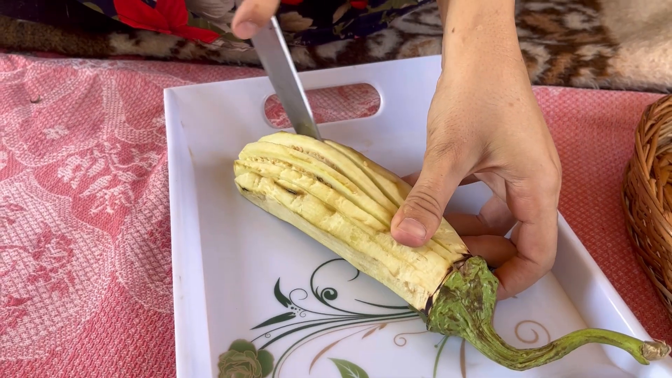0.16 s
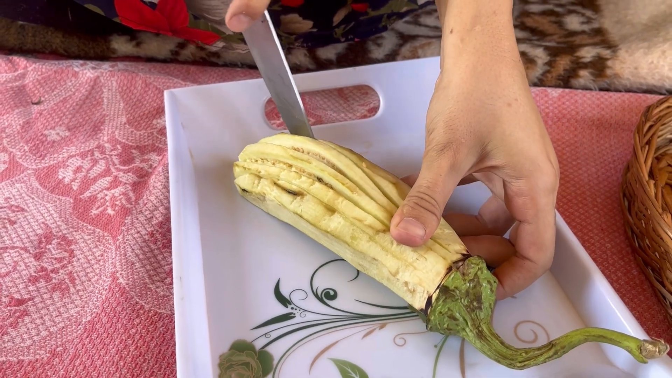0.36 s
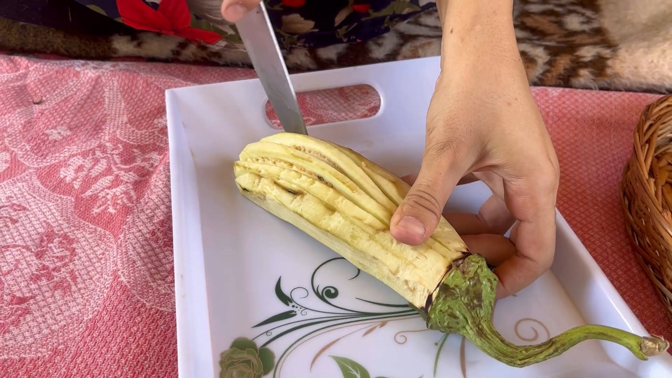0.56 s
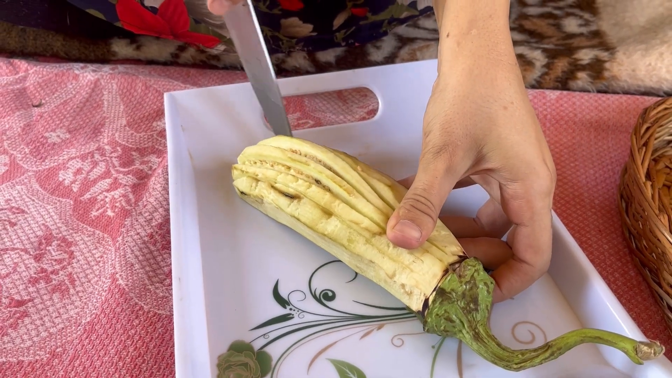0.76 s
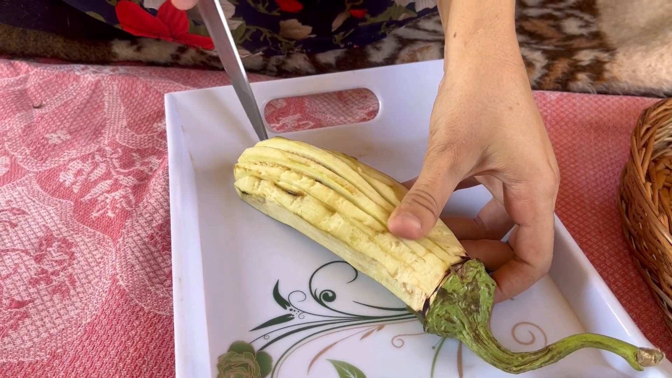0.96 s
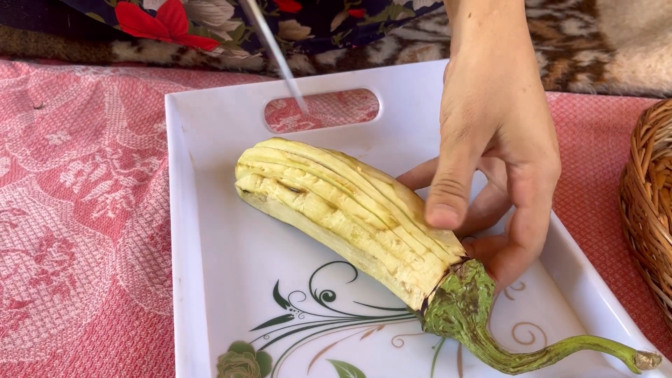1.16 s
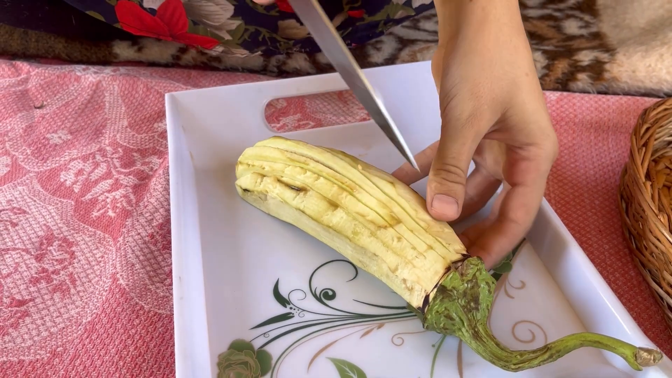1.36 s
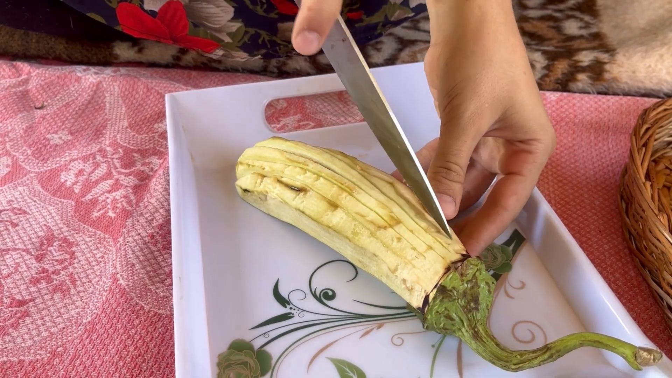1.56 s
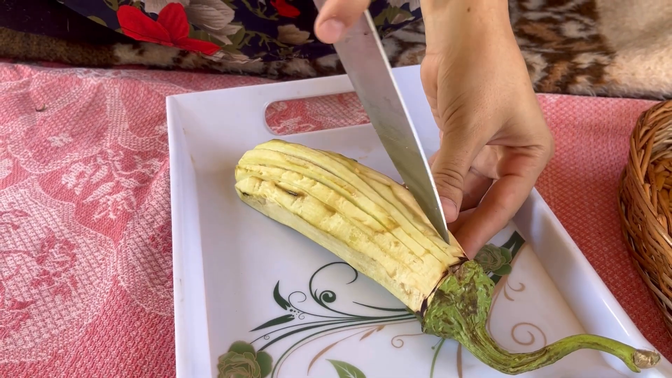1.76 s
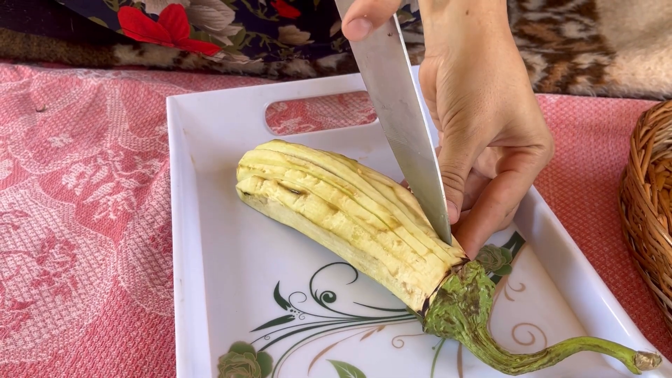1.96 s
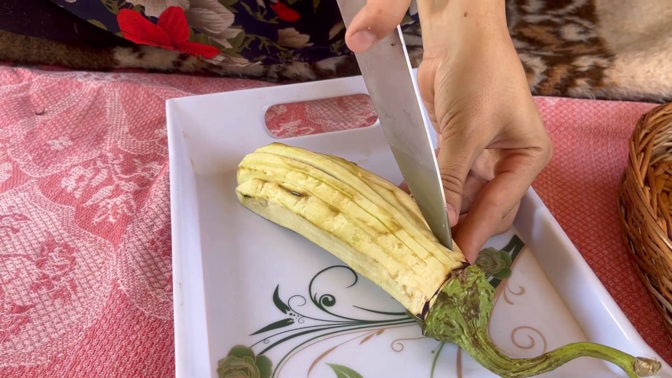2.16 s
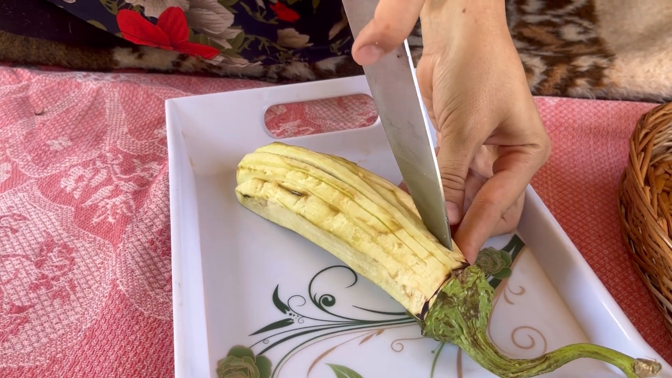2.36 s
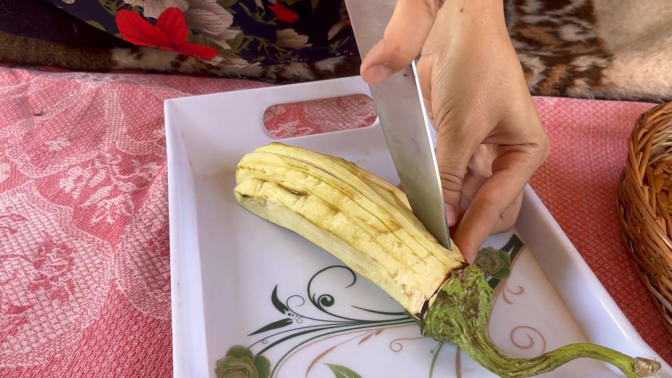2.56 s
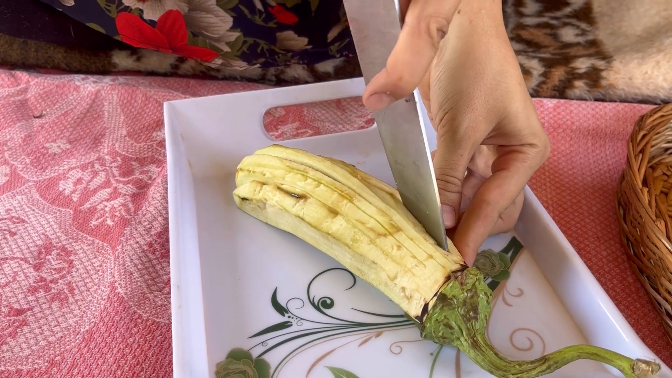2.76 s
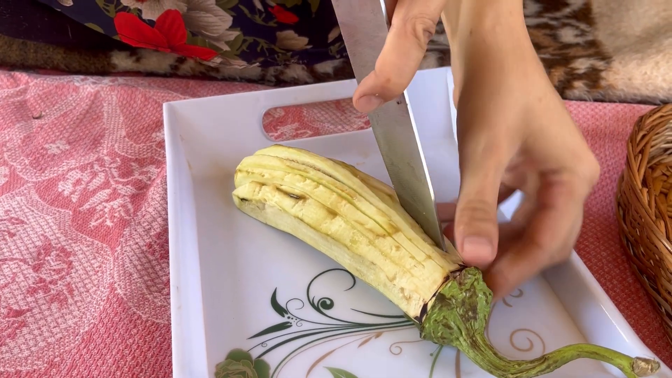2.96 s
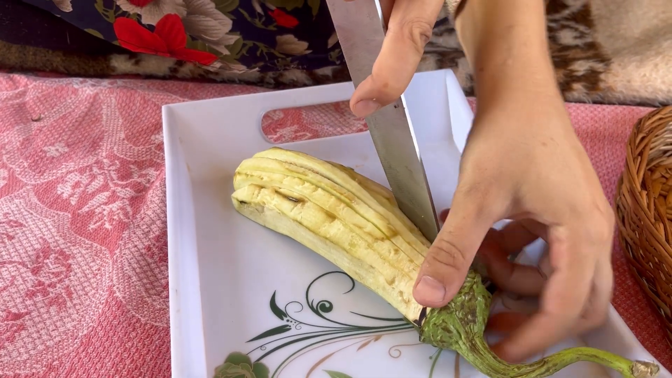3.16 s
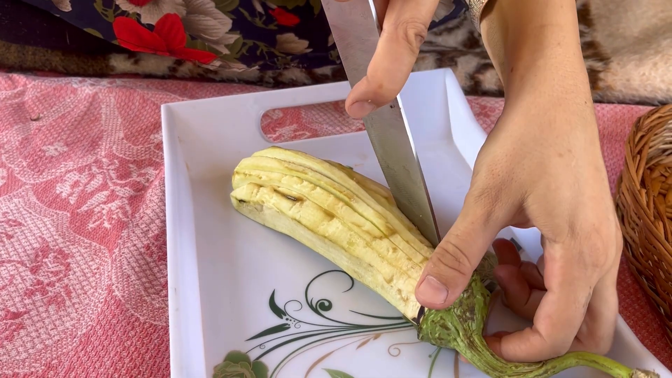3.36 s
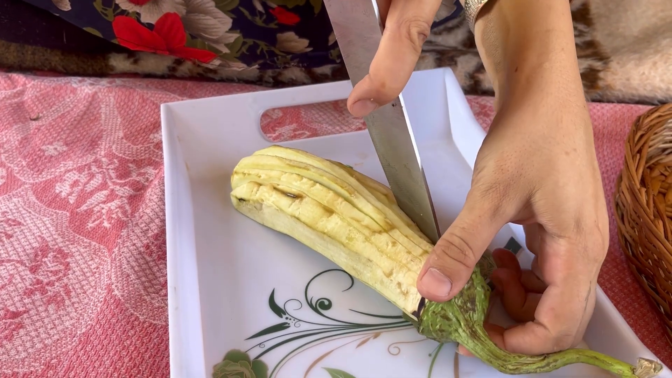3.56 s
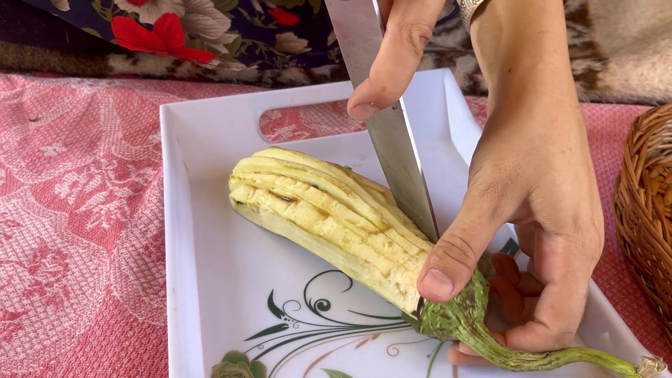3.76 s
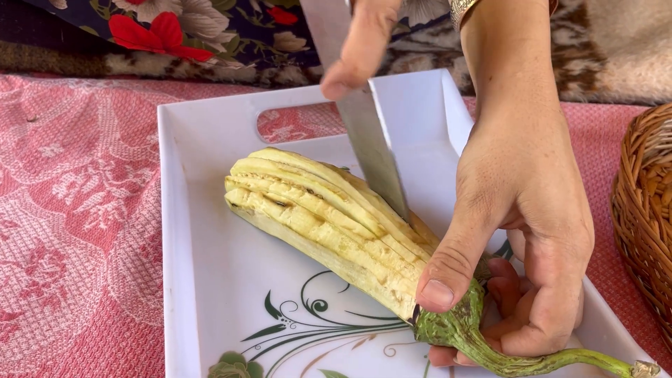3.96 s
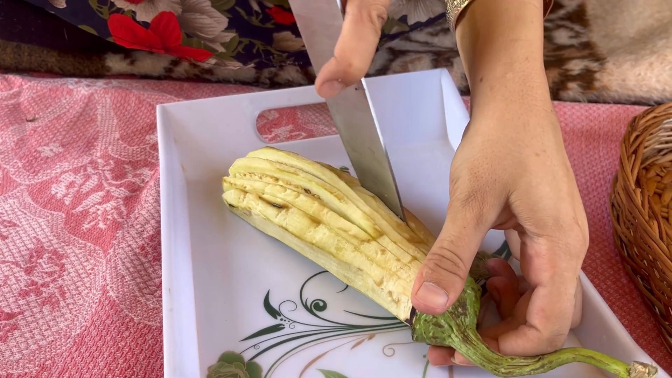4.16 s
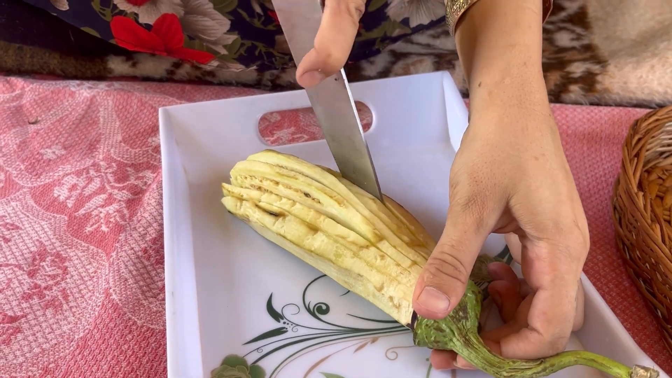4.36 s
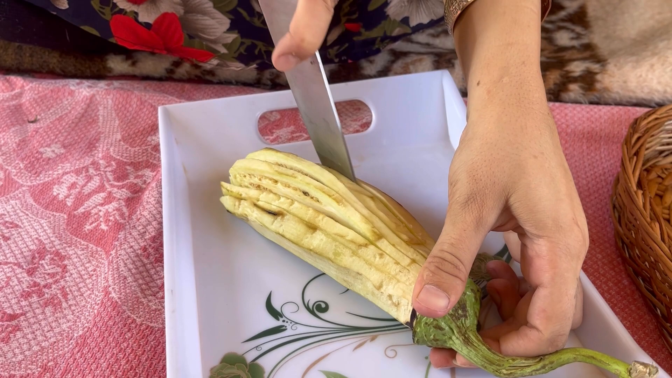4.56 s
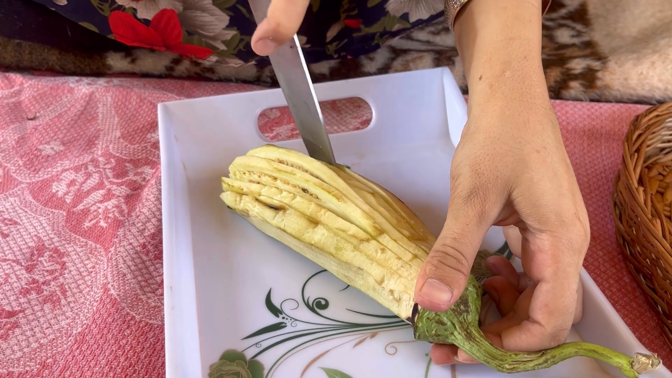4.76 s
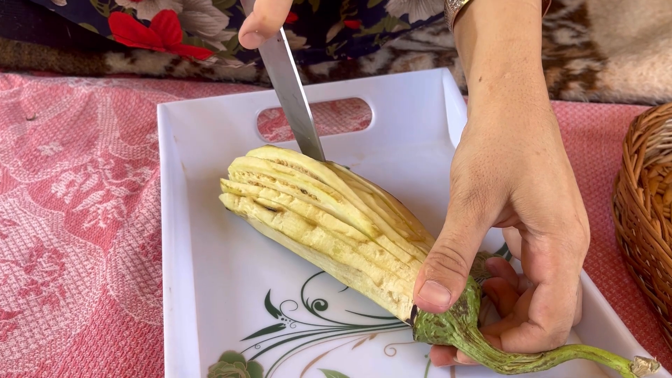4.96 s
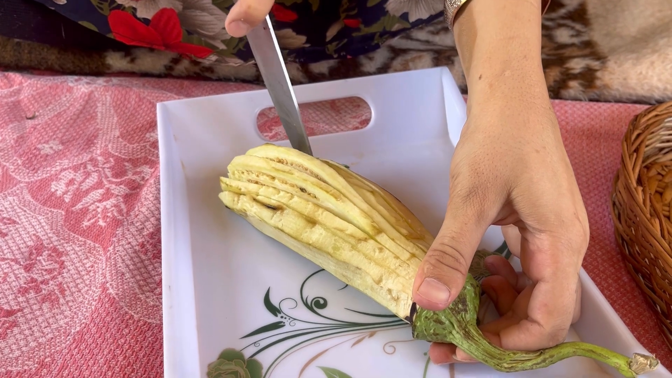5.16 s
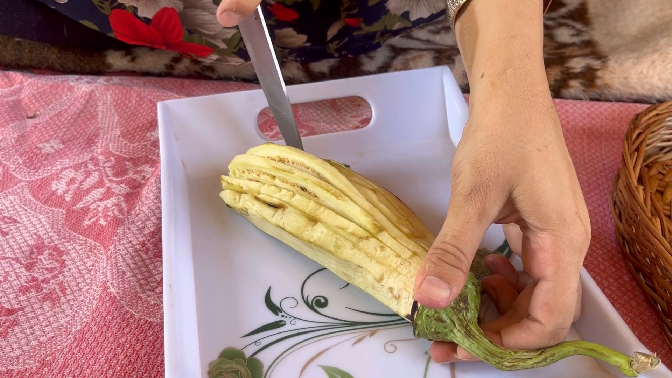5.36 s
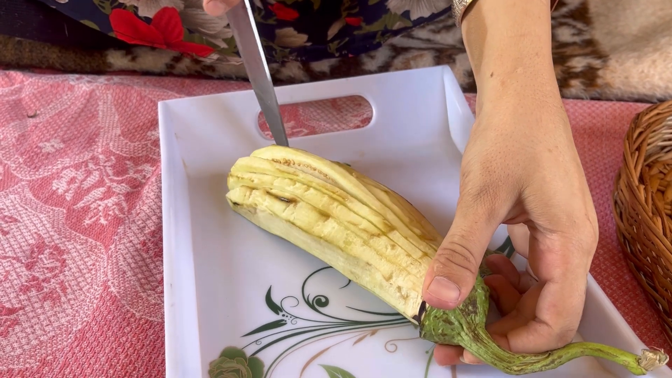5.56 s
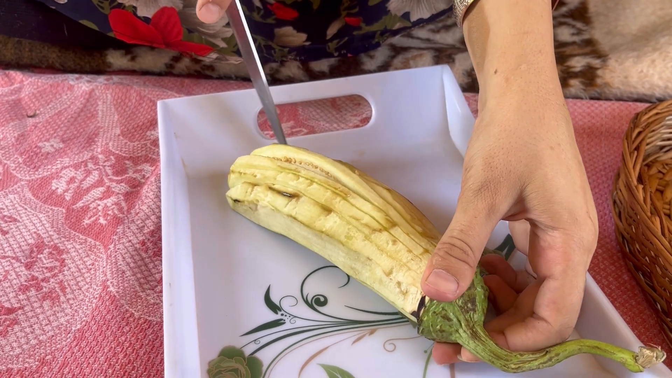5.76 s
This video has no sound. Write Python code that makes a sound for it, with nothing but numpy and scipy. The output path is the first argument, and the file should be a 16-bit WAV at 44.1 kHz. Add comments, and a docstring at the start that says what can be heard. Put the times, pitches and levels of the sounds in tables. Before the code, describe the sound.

Close stereo pickup in a quiet room: a knife cuts a peeled eggplant on a plastic tray. Sharp knocks and short gritty strokes with a brief steely ring fill the first second. A quieter stretch follows, with barely audible slides and one strong tap, before sawing and tapping resume near four seconds. Soft air noise, fuzzy hum and uneven low rumble stay underneath.

```python
"""A kitchen knife cuts a peeled vegetable on a plastic tray, close to two microphone ports, in a quiet room.
First second: the tip knocks the tray (click, falling sweep, modes); short strokes rasp and ring the blade.
Until 3.9 s: mostly faint slides (quieter strokes) and a few knocks; then strokes and knocks again.
Strokes are gritty noise through power arches, blade resonances and tray spectra.
Throughout: coloured air noise, two fuzzy hums and a low rumble of changing level (resonated noise)."""
import sys
import numpy as np
from scipy import signal
from scipy.fft import rfft, irfft
from scipy.io import wavfile
from scipy.ndimage import uniform_filter1d

SR = 44100
rng = np.random.default_rng(int(sys.argv[2]) if len(sys.argv) > 2 else 0)


def generate_wav(sig):
    """Save sig (samples, or channels by samples) to the path in sys.argv[1] as 16-bit PCM at SR."""
    pcm = np.round(np.clip(np.atleast_2d(sig).T, -1, 1) * 32767).astype(np.int16)
    wavfile.write(sys.argv[1], SR, pcm)


N = 255545


def gain_of(db):
    """Decibels to gain."""
    return 10 ** (np.asarray(db) / 20)


def evened(x):
    """Scales to rms 1."""
    return x / np.sqrt(np.mean(x ** 2) + 1e-20)


def read(points, hz, column=1):
    """Reads a table on a log-frequency axis."""
    table = np.transpose(points)
    return np.interp(np.log(hz + 1), np.log(table[0] + 1), table[column])


def coloured(x, points):
    """Filters x by a table of gains, at rms 1."""
    hz = np.fft.rfftfreq(x.shape[-1], 1 / SR)
    return evened(irfft(rfft(x) * gain_of(read(points, hz)), x.shape[-1]))


def resonate(x, hz, width_hz):
    """A fixed one-pole resonance of gain 1 at its peak."""
    pole = np.exp((2j * np.pi * hz - np.pi * width_hz) / SR)
    return 2 * signal.lfilter([1 - abs(pole)], [1, -pole], x + 0j).real


def patchy(x, depth_db, bins, frames):
    """Random drifting peaks and dips over time and frequency, alike for both rows."""
    z = signal.stft(x, nperseg=512, noverlap=384)[2]
    field = rng.standard_normal(z.shape[1:])
    field = uniform_filter1d(field, size=bins, axis=0)
    field = uniform_filter1d(field, size=frames, axis=1)
    field = gain_of(depth_db * evened(field))
    return signal.istft(z * evened(field), nperseg=512, noverlap=384)[1][:, :N]


# phase between the ports: (frequency [Hz], lead of left [rad])
PORT_LEAD = [(60, 0), (600, .3), (1290, .5), (1900, 2.4), (2300, .3), (3900, .8), (5340, .9), (6100, .4),
             (6600, -1.2), (8100, -1.4), (9000, -2.2), (9500, -np.pi), (11000, -np.pi), (13700, -2 * np.pi)]
# level between the ports: (frequency [Hz], left minus right [dB])
PORT_TILT = [(60, .1), (380, .1), (700, -1.1), (1290, -1.1), (2380, 1.5), (4400, 4.), (8120, 1.1),
             (9500, 0)]
# decorrelation of the ports: (frequency [Hz], unlike share near the knife [0-1], in the room [0-1])
PORT_UNLIKE = [(60, .1, .2), (400, .08, .5), (1300, .4, .8), (2500, .3, .8), (6000, .35, .7),
               (9000, .2, .4), (12300, .2, .3), (13800, .02, .02)]


def ports(x, other, unlike_column):
    """Two microphone ports: part of the sound is unrelated, the rest is shifted in phase and level."""
    hz = np.fft.rfftfreq(N, 1 / SR)
    unlike = np.clip(read(PORT_UNLIKE, hz, column=unlike_column), 0, 1)
    same = np.sqrt(1 - unlike ** 2 / 2) * rfft(x)
    odd = unlike / np.sqrt(2) * rfft(other)
    skew = gain_of(read(PORT_TILT, hz) / 2) * np.exp(.5j * read(PORT_LEAD, hz))  # half to each port
    return irfft([(same + odd) * skew, (same - odd) / skew], N)


# relative spectrum of the air noise: (frequency [Hz], density [dB per Hz])
AIR_SPECTRUM = [(30, -42), (60, -5), (250, -10.5), (450, -15), (900, -8.5), (1300, -5.5), (1900, -4),
                (2600, -9), (2900, -13.5), (4500, -15), (6200, -17.5), (6800, -22), (10000, -27),
                (13500, -26.5), (16000, -44)]
# levels of rumble and hums: (time [s], low rumble [dB], hum near 520 Hz [dB], whirr near 1380 Hz [dB])
HUM_LEVELS = [(0, -58, -66.5, -67), (.4, -67.5, -64.5, -61.5), (.84, -72, -64, -60), (1.0, -68, -64, -61.5),
              (1.38, -75, -64, -60.5), (1.48, -89, -77.5, -65.5), (2.05, -88, -75.5, -66),
              (2.6, -74, -78, -66), (2.78, -59, -69, -56.5), (2.9, -79, -65, -62.5), (3.241, -78, -69, -60),
              (3.45, -85, -79.5, -68.5), (3.92, -73, -73.5, -67), (4.11, -75, -62, -67),
              (4.42, -69, -65, -59), (4.8, -81, -68.5, -60.5), (5.3, -74, -62.5, -62.5),
              (5.55, -57.5, -65, -60), (5.79, -67, -65.5, -61.5)]


def room():
    """Soft air noise, two fuzzy hums and a low rumble of changing level, as resonated noise."""
    time_s, *columns = np.transpose(HUM_LEVELS)
    low_db, hum_db, whirr_db = (np.interp(np.arange(N) / SR, time_s, db) for db in columns)
    air_db = -62.5 + 0.15 * (hum_db + 76.5)  # follows the hum by 0.15 dB per dB
    noise = rng.standard_normal((4, 2, N))
    uneven = patchy(noise[0], 1.5, bins=2, frames=200)  # the colour of the air drifts a little at random
    air = coloured(uneven, AIR_SPECTRUM)
    low = resonate(resonate(noise[1], 73.5, 38), 73.5, 38) + gain_of(-10.5) * resonate(noise[1], 140, 40)
    hum = resonate(resonate(noise[2], 521.6, 55), 521.6, 55)
    whirr = resonate(resonate(noise[3], 1375, 190), 1375, 190)
    sound = gain_of(air_db) * air + gain_of(low_db) * evened(low)
    sound += gain_of(hum_db) * evened(hum) + gain_of(whirr_db) * evened(whirr)
    return ports(*sound, unlike_column=2)


# relative spectrum of the click: (frequency [Hz], gain [dB])
CLICK_SPECTRUM = [(300, -44), (1000, 19), (2200, 11), (3000, 3), (4000, 6.5), (5000, 5.5), (8000, -2),
                  (12500, 0), (16000, -19)]
# modes of the tray held down by the vegetable, before pitch factor and ring or click level:
# (frequency [Hz], level [dB], t60 [s])
TRAY_MODES = [(117, -5, 0.1), (217, -16, 0.086), (269, -4.5, 0.072), (337, 7.5, 0.037),
              (458.5, -13.5, 0.11), (805, -17.5, 0.047), (1130, -10, 0.012), (1584, -10, 0.029),
              (1830, -15, 0.002), (2310, -13, 0.03), (2390, -8, 0.02), (3240, -20, 0.031),
              (3970, -21, 0.022)]


def knock(sweep_hz, under_hz, t60_s, click_db, ring_db, pitch):
    """Bending waves disperse: a click, a falling sweep, then the modes of the tray."""
    t = np.arange(SR // 5) / SR
    cycles = 2 * sweep_hz * np.sqrt(t / 1000) + under_hz * t  # pitch falls as 1 / sqrt(t)
    crest = np.argmax(cycles >= 1)
    since_crest_s = t - t[crest]
    onset = np.minimum(t / t[crest], 1) ** 2
    sweep = np.cos(2 * np.pi * cycles) * onset * gain_of(-60 * (t / t60_s) ** 0.94)
    burst = rng.standard_normal((2, len(t))) * gain_of(-1.5 - 60 * t / 0.015)  # grit under the tip
    burst[0, crest] += 2.5
    click = coloured(burst, CLICK_SPECTRUM) * (t < .1)
    ring = 0
    for hz, db, decay_s in TRAY_MODES:
        part_db = ring_db if hz < 700 else click_db  # upper modes follow the hardness of the click
        swell = 1 - np.exp(-t * hz ** 2 / 1100)  # slower for low modes
        wave = np.cos(2 * np.pi * hz * pitch * since_crest_s)  # all modes crest together
        ring = ring + gain_of(db + part_db - 60 * t / decay_s) * swell * wave
    thud = sweep + ring
    return t[crest], np.array([thud, np.roll(thud, 9)]) + gain_of(click_db) * click / abs(click[0]).max()


# knocks of the tip on the tray: (time of crest [s], level [dB], sweep at 1 ms [Hz], pitch under the sweep [Hz],
# sweep t60 [s], click re level [dB], ring re level [dB], tray pitch factor [1])
TIP_KNOCKS = [(.0074, -29.5, 675, 11, 0.023, -10, -17, 0.66), (0.1235, -15, 744, 14, 0.044, -6, -8.5, 0.75),
              (0.334, -39.5, 302, 160, 0.076, -17, -11, 1.1), (.670, -47, 500, 180, .02, -4.5, -2, 1.),
              (0.717, -35.5, 303, 230, 0.034, 1, -1, 0.74), (0.784, -33, 490, 170, .02, -4, -16, 0.94),
              (0.8034, -14.5, 290, 292, 0.035, -9, -29, 1.43), (0.976, -43, 250, 270, 0.062, -28, -2, 1.1),
              (2.6765, -17, 644, 17.6, 0.054, -1, 4.5, 0.92), (2.9926, -63, 666, 18, 0.02, 14, -14, 1.2),
              (3.093, -63.5, 710, 18, 0.018, 16, 12, 0.75), (3.9744, -31.5, 677, 25, 0.063, 1, 2, 0.84),
              (4.0179, -40, 664, 44, 0.072, -5, 3.5, 0.93), (4.1807, -19.5, 662, 28, 0.053, -4, -16, 0.85),
              (4.2286, -36.5, 685, 18, 0.016, -16, 3, 0.43),
              (4.3814, -17.5, 705, 15, 0.037, -4, -16.5, 0.83),
              (4.4022, -24, 300, 400, 0.025, -10, -3, 0.74), (4.5243, -35, 300, 170, 0.042, -11, -23, 1.2),
              (4.660, -62, 680, 20, .02, 4, -12, 0.9), (5.1753, -33, 404, 300, 0.019, -7, -37, 0.7),
              (5.4618, -31, 510, 170, 0.019, -18, 2, 0.95)]


def knocks():
    """Every knock, with a noise tail from cloth and walls and a resonant rattle of the tray on the cloth."""
    tray = np.zeros((2, N + SR))
    for crest_s, db, *feel in TIP_KNOCKS:
        rise_s, sound = knock(*feel)
        at = round((crest_s - rise_s) * SR)
        tray[:, at:at + sound.shape[1]] += gain_of(db) * sound
    t = np.arange(SR // 4) / SR
    tail = signal.lfilter([1], [1, -.8], rng.standard_normal((2, len(t))))
    tail *= gain_of(-60 * t / 0.5) * (t > .008)
    wet = signal.oaconvolve(tray[:1], tail / np.linalg.norm(tail[0]), axes=1)
    buzz = resonate(rng.standard_normal((2, len(t))), 2000, 2100)
    buzz *= gain_of(-60 * t / .12) * (t > .003)
    rattle = signal.oaconvolve(tray[:1], buzz / np.linalg.norm(buzz[0]), axes=1)
    mix = tray[:, :N] + gain_of(-27.5) * wet[:, :N] + gain_of(-15.5) * rattle[:, :N]
    return ports(*mix, unlike_column=1)


def arch(t, full_s, rise_s, hold_s, fall_s):
    """Power of one stroke: it gathers speed, holds it and runs out."""
    edge_db, rise_bend, fall_bend = -25.5, 1.12, 1.28  # level at the ends of rise and fall; flank exponents
    early = np.maximum(full_s - t, 0) / max(rise_s, .003)
    late = np.maximum(t - full_s - hold_s, 0) / max(fall_s, .003)
    return gain_of(2 * edge_db * (early ** rise_bend + late ** fall_bend))


def linger(power, echo_db, t60_s):
    """Gain of a power curve (one value a millisecond) with a dying echo, at every sample."""
    keep = gain_of(-120 / (1000 * t60_s))
    echo = signal.lfilter([gain_of(2 * echo_db) * (1 - keep)], [1, -keep], power)
    return np.interp(np.arange(N) / SR, np.arange(len(power)) / 1000, np.sqrt(power + echo))


# modes of the steel blade, damped by the flesh: (frequency [Hz], width [Hz], level before the lift [dB])
BLADE_MODES = [(2026, 47, -1.5), (2204, 21, 0.5), (2440, 260, 2), (3019, 38, 1.5), (3970, 86, -15.5),
               (3923, 35, -8), (3970, 22, -2.5), (4930, 90, 3.5), (5150, 190, -37), (5383, 43, 3.5),
               (5860, 40, 1.5), (5920, 23, -6.5), (6540, 43, -5), (8870, 190, 3), (14000, 73, -6.5)]
# saw strokes of the edge through the flesh: (time at full speed [s], level [dB], rise [s], hold [s], fall [s],
# tray body re level [dB], tray thrum re level [dB], fine hiss re level [dB], blade share of power [0-1],
# mode left free by the grip of the flesh [Hz], second free mode [Hz], lift of both [dB])
SAW_STROKES = [(0.126, -49, 0.016, 0.026, 0.035, -1, -10, -6.5, 0.2, 4800, 4800, 15),
               (0.328, -52, 0.043, 0.033, .025, 5, 6, -9.5, 0.2, 2930, 6150, 3),
               (0.502, -49, 0.054, 0.02, 0.033, 1, -0.5, -10.5, 0.46, 2220, 2980, 9),
               (0.681, -47.5, 0.043, 0.039, 0.019, 5.5, 4.5, -10, .4, 3600, 5700, -5),
               (0.799, -29.5, 0.023, 0.0047, 0.024, -3.5, -11, -12, 0.7, 6200, 2372, 21),
               (0.813, -30.5, 0.0065, .014, .02, -9, -13.5, -3.5, 0.53, 2080, 6200, 8),
               (.834, -35.5, 0.0143, 0.011, 0.034, -19, -6, -17, 1, 2110, 5110, 17.5),
               (0.974, -57, 0.016, 0.0045, 0.024, 3, 1, -5.5, .6, 2190, 2243, 20),
               (3.919, -47, 0.013, .03, 0.052, -3.5, -11, -5, 0.27, 2035, 6100, 22),
               (4.186, -43, 0.015, 0.042, 0.015, 3.5, 0.5, -8.5, 0.4, 5400, 5340, 10),
               (4.406, -48.5, 0.042, 0.017, 0.026, 5, 7, -7, 0.54, 3860, 4800, 13),
               (4.554, -45.5, 0.033, 0.038, 0.028, 3.5, 3.5, -9, 0.3, 4020, 5240, 26),
               (4.65, -64, 0.033, 0.016, 0.024, 7, 7.5, -3, 0.2, 3950, 4900, 10),
               (4.753, -58, 0.053, 0.037, 0.052, 11, 10, -2.5, 0.2, 4780, 4860, 11),
               (4.823, -55.5, 0.029, 0.013, 0.087, 9.5, 7.5, -5, 0.45, 3030, 3030, 5),
               (4.93, -64, 0.047, .016, 0.03, 10, 5, -3, 0.5, 3050, 3050, 14),
               (5.021, -52, 0.047, 0.024, 0.048, 9, 2.5, -5.5, .3, 4800, 4800, 12),
               (5.101, -56.5, 0.028, 0.023, 0.058, 4, 0.5, -11, 0.07, 3030, 2120, 17),
               (5.172, -56, 0.032, 0.013, 0.022, 6.5, 5.5, -9, 0.3, 3050, 2110, 12),
               (5.2, -49.5, 0.023, 0.022, .03, 4.5, -1, -12, 0.5, 3030, 2150, 14),
               (5.306, -46, 0.024, 0.011, 0.039, -2.5, -2.5, -12, 0.7, 2200, 3077, 26),
               (5.425, -56, .04, .02, .02, 2, 5, -6, .3, 3040, 2394, 11),
               (5.451, -45.5, 0.014, .006, .01, 1, 2.5, -8, 0.3, 3040, 2394, 9),
               (5.461, -29, 0.0036, 0.015, 0.013, -6.5, -7, -18, 0.97, 5420, 2414, 9.5),
               (5.484, -38.5, 0.0094, 0.0041, 0.023, 4, 4.5, -26, 0.7, 3020, 2400, 12),
               (5.505, -57.5, .015, 0.0075, 0.067, 5, 4.5, -24, 0.17, 3070, 2450, 8)]


def blade_singing(tearing):
    """Tearing noise rings the blade modes; the grip of the flesh sets which of them are lifted."""
    strokes_t = np.transpose(SAW_STROKES)
    begun_s = strokes_t[0] - strokes_t[2]
    order = np.maximum.accumulate(begun_s)
    current = np.searchsorted(order, np.arange(N) / SR, "right").clip(1) - 1  # stroke last begun
    free_hz, lift_db = strokes_t[-3:-1], strokes_t[-1]
    ringing, power = 0, 0
    for hz, width_hz, db in BLADE_MODES:
        nearness = np.exp(-(np.log(hz / free_hz) / .03) ** 2).max(0)
        gain = gain_of(db + lift_db * nearness)[current]
        ringing = ringing + gain * evened(resonate(tearing, hz, width_hz))
        power = power + gain ** 2
    return ringing / np.sqrt(power)


# faint slides of blade and fingers, mostly in the pause between the cuts: (time at full speed [s], level [dB],
# rise [s], hold [s], fall [s], tray body re level [dB], tray thrum re level [dB], fine hiss re level [dB])
FAINT_SLIDES = [(0.101, -65, .015, 0.0032, 0.012, 6, 2, -4), (1.82, -73.5, .04, 0.034, 0.057, -8, -8, -1),
                (1.92, -75.5, 0.049, 0.067, 0.081, 6, 3, 0.5), (2.025, -75, 0.034, 0.025, 0.063, 5, 2, -6),
                (2.176, -71.5, 0.046, 0.056, 0.12, -10, -0.5, -1),
                (2.372, -70, 0.042, 0.075, 0.065, 8, 8, 0),
                (2.581, -62, 0.06, 0.11, 0.024, 4.5, -3.5, -6.5),
                (2.99, -62.5, .02, .006, 0.046, -8, -15, -6), (3.027, -73, 0.045, 0.05, 0.052, 8.5, -3, -4),
                (3.096, -59, 0.029, .006, 0.035, 0, -15, 2),
                (3.123, -62.5, 0.024, 0.089, 0.074, 3.5, -3.5, -10),
                (3.39, -63.5, .06, 0.033, 0.039, -6, -27, -10),
                (3.662, -63.5, 0.037, .01, 0.026, -4, -6.5, -7),
                (3.773, -67.5, 0.036, 0.042, 0.047, -9, -32, -5),
                (4.521, -68.5, 0.036, 0.022, .03, 16, 16, 1), (4.994, -62.5, 0.039, 0.012, .03, 3, 5, -2)]
# relative spectrum of the rasp: (frequency [Hz], gain [dB])
RASP_SPECTRUM = [(1500, -69), (2500, -3), (3400, -1.5), (4400, -1), (5300, -2.5), (6600, -7), (9000, -5.5),
                 (10500, -14), (12500, -8), (14900, -20), (16000, -32)]
# relative spectrum of the tray body: (frequency [Hz], gain [dB])
BODY_SPECTRUM = [(500, -127), (800, -21.5), (1150, -11), (1540, -15.5), (1900, -6), (2500, -27.5),
                 (3300, -58.5), (5000, -56)]
# relative spectrum of the tray thrum: (frequency [Hz], gain [dB])
THRUM_SPECTRUM = [(60, -20), (120, -4.5), (200, -5), (300, 7), (500, 6.5), (800, 0.5), (1100, -53),
                  (2000, -86)]


def strokes():
    """Fibres tearing make a dense gritty noise; it hisses, shakes the tray and rings the blade."""
    rows = [row[:9] for row in SAW_STROKES] + [(*row, .15) for row in FAINT_SLIDES]  # slides: blade share .15
    full_s, level_db, rise_s, hold_s, fall_s, body_db, thrum_db, hiss_db, sing = np.transpose(rows)
    clock_s = np.arange(0, N / SR, 1 / 1000)
    arches = np.array([arch(clock_s, *row) for row in zip(full_s, rise_s, hold_s, fall_s)])
    power = arches.T * gain_of(2 * level_db)
    sing = np.clip(sing, 0, 1)
    rasp_gain = linger(power @ (1 - sing), -17.5, 0.35)  # lingers in the room
    ring_gain = linger(power @ sing, -21, .12)  # the flesh damps the blade
    hiss_gain = linger(power @ gain_of(2 * hiss_db), -8, .08)
    body_gain = linger(power @ gain_of(2 * body_db), -11.5, 0.34)
    thrum_gain = linger(power @ gain_of(2 * thrum_db), -11.5, 0.34)

    slow = evened(uniform_filter1d(rng.standard_normal(N), size=50))
    grit = gain_of(1.6 * slow.clip(-2.5, 2.5))  # the edge catches and slips
    # the colour of the tearing noise drifts at random in patches
    tearing = patchy(grit * rng.standard_normal((2, N)), 2.4, bins=3, frames=30)
    fine = coloured(tearing, RASP_SPECTRUM)
    top = signal.sosfiltfilt(signal.butter(3, 10500, "high", fs=SR, output="sos"), fine)

    knife = rasp_gain * evened(fine - top) + ring_gain * blade_singing(tearing) + hiss_gain * evened(top)
    tray = body_gain * coloured(tearing, BODY_SPECTRUM) + thrum_gain * coloured(tearing, THRUM_SPECTRUM)
    return ports(*(knife + tray), unlike_column=1)


def scene():
    """Room, knocks and strokes."""
    return room() + knocks() + strokes()


def record(dry):
    """The microphone drops the deep bass; then the band limit."""
    thin = signal.sosfilt(signal.butter(3, 48., "high", fs=SR, output="sos"), dry)
    low_pass = signal.firwin(511, 15850, window=("kaiser", 9), fs=SR)
    return signal.oaconvolve(thin, low_pass[None], "same")


dry = scene()
out = record(dry)
generate_wav(out)
```